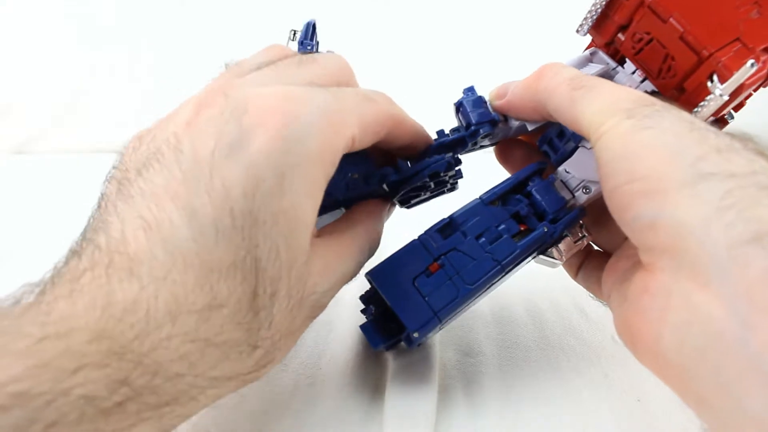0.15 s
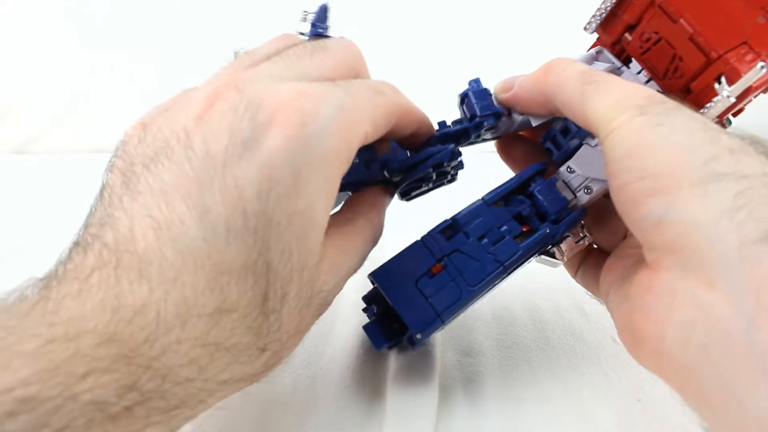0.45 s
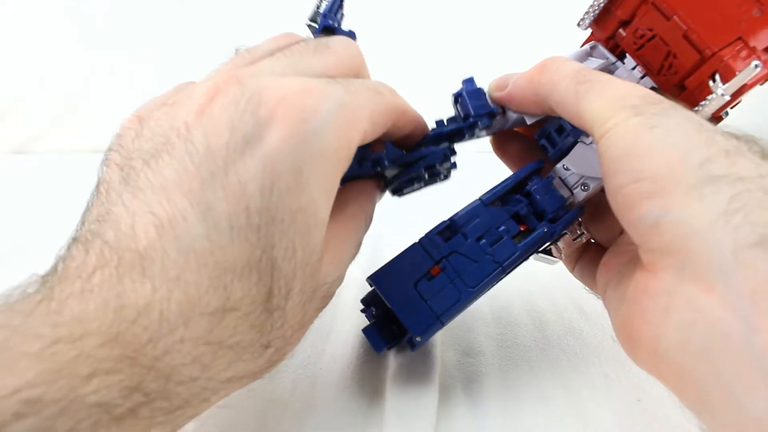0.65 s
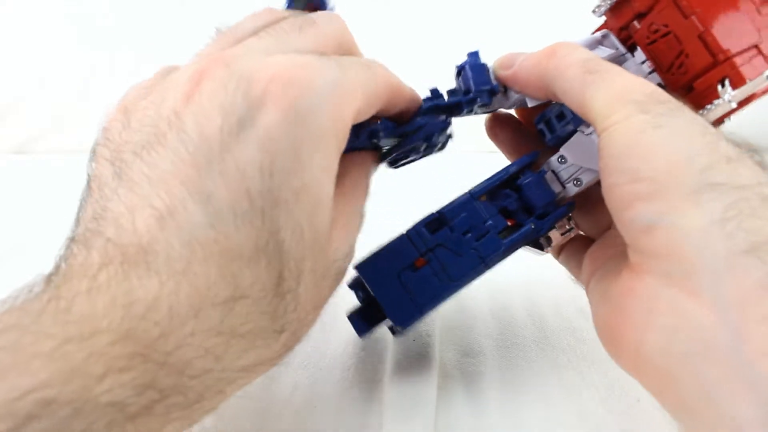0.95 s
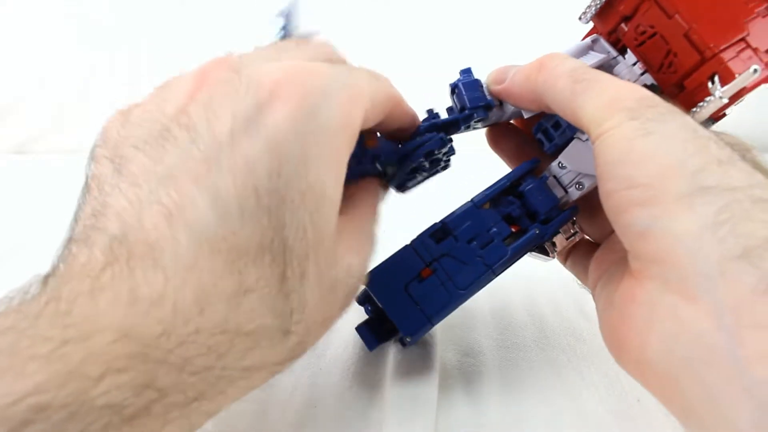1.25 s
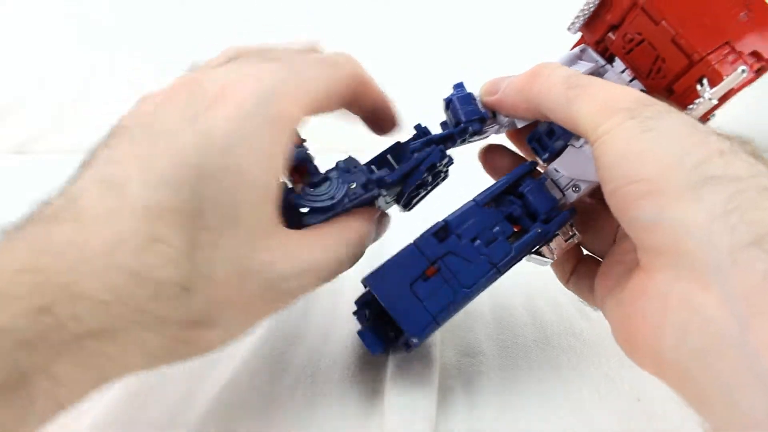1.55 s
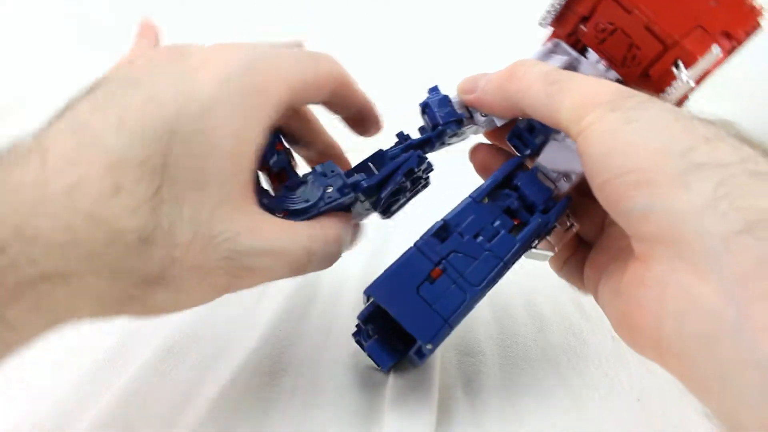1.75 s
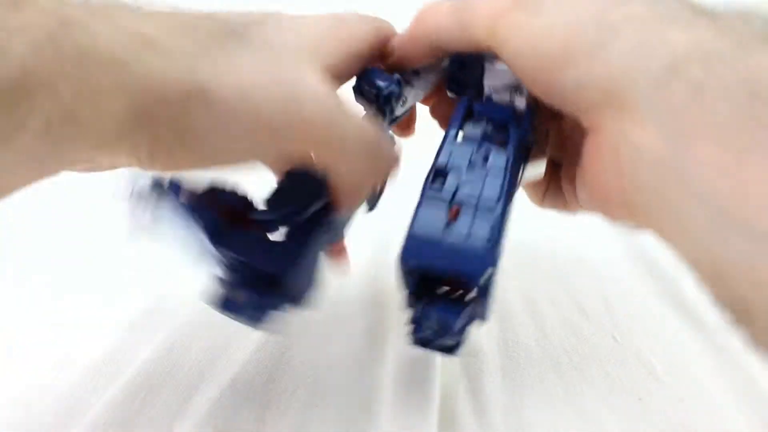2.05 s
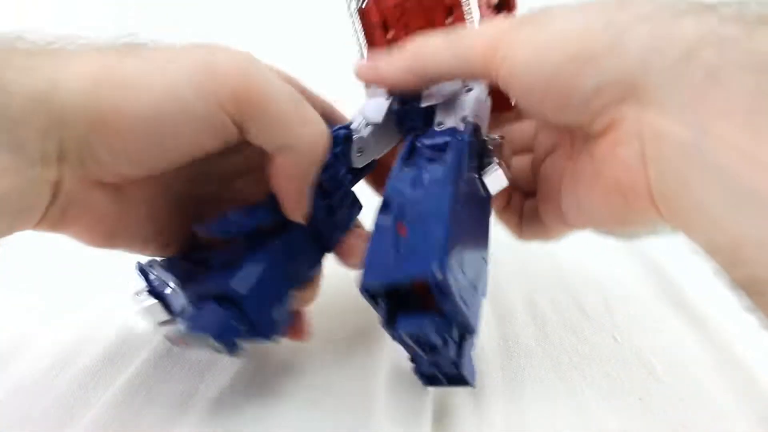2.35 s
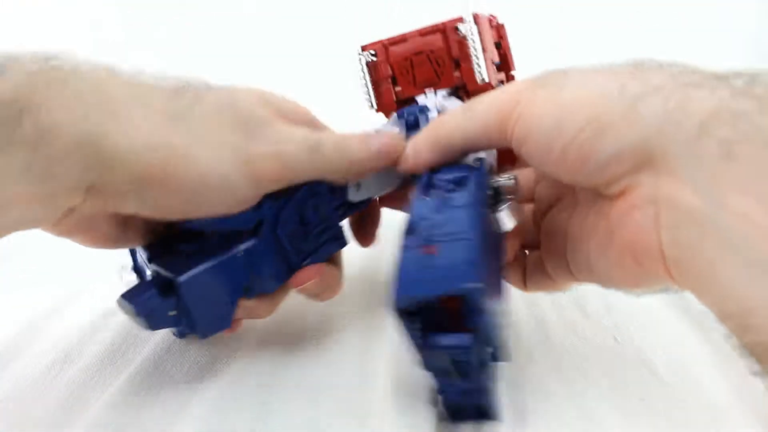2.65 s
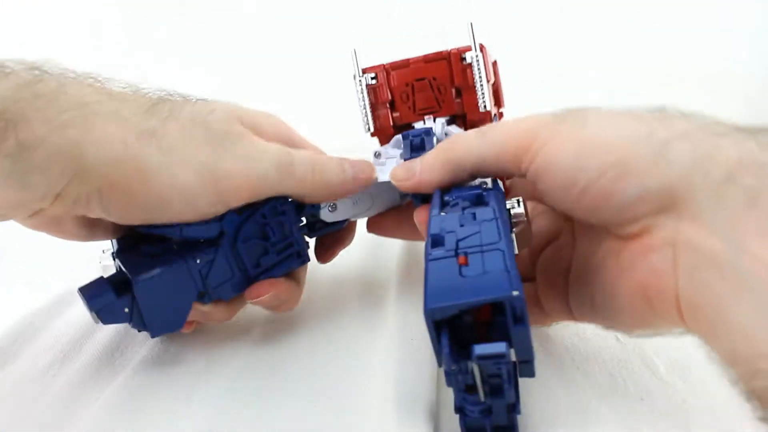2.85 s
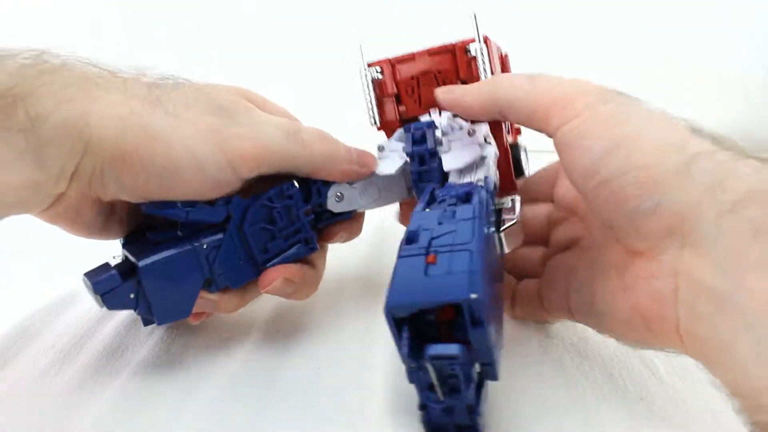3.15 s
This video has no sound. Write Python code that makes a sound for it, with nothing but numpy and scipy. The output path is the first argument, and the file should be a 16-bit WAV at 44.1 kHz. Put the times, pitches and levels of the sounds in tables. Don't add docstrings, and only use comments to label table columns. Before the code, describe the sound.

Plastic toy parts click softly as they are turned by hand, ending in three hard clacks

```python
import sys
import numpy as np
from scipy import signal
from scipy.io import wavfile

SR = 44100
rng = np.random.default_rng(int(sys.argv[2]) if len(sys.argv) > 2 else 0)


def natural_amplitude(level_db):
    exponent = np.asarray(level_db, float) / 20
    return 10 ** exponent


def inscribe(sig):
    pcm = np.round(np.clip(np.atleast_2d(sig).T, -1, 1) * 32767)
    wavfile.write(sys.argv[1], SR, pcm.astype(np.int16))


N = 145530

# (frequency [Hz], level [dB], t60 [s])
SHELL_MODES = [(1050, -3, .02), (1450, -12, .015), (1950, -3, .02), (2400, -6, .015), (3190, -3, .012),
               (4170, -4, .012), (5200, -2, .012), (5990, -1, .012), (6730, 0, .012), (7650, -2, .01),
               (8580, -3, .01), (10500, -5, .008), (12300, -4, .008), (13500, -7, .008)]


def rms_one(x):
    return x / np.sqrt(np.mean(x ** 2) + 1e-20)


def at_hz(points, hz):
    table_hz, values = np.transpose(points)
    return np.interp(np.log(hz), np.log(table_hz), values)


def band(x, low_hz, high_hz, order=2):
    sos = signal.butter(order, [low_hz, min(high_hz, .45 * SR)], "band", fs=SR, output="sos")
    return signal.sosfilt(sos, x)


def cut(x, top_hz):
    return signal.sosfilt(signal.ellip(8, .5, 60, top_hz, fs=SR, output="sos"), x)


def drift(rate_hz):
    r = np.exp(-80 * np.pi * rate_hz / SR)
    slow = signal.lfilter([1], [1, -2 * r, r * r], rng.standard_normal(N // 40 + 2002))[2000:]
    return np.interp(np.arange(N) / 40, np.arange(len(slow)), rms_one(slow - slow.mean()))


def ring(x, hz, t60_s):
    r, w = natural_amplitude(-60 / (t60_s * SR)), 2 * np.pi * hz / SR
    return signal.lfilter([0, np.sin(w)], [1, -2 * r * np.cos(w), r * r], x + 1e-18)


def resonant_noise(peaks):
    return sum(natural_amplitude(db) * rms_one(ring(rng.standard_normal(N), hz, 2.2 / width_hz)) for hz, width_hz, db in peaks)


def add(out, x, s):
    i = int(s * SR)
    out[i:i + len(x)] += x[:N - i]


def coloured(spectrum, patchy_db):
    out, edges_hz = 0, 40 * 2 ** np.arange(0, 9.1, .5)
    white = rng.standard_normal((2, N))
    for k, (low_hz, high_hz) in enumerate(zip(edges_hz, edges_hz[1:])):
        gain = natural_amplitude(at_hz(spectrum, np.sqrt(low_hz * high_hz)) + patchy_db * drift(12.0))
        out = out + gain * band(white[k % 2], low_hz, high_hz)
    return rms_one(out)


def quiet_air():
    # (frequency [Hz], density [dB per Hz])
    air_spectrum = [(40, 4.5), (82, -20), (215, -17), (420, -23.5), (800, -24.5), (2000, -34),
                    (5000, -45.5), (13000, -48)]
    # (frequency [Hz], width [Hz], level [dB])
    hum_peaks = [(63, 26, -85), (125, 24, -78.5), (228, 49, -77.5), (416.8, 46, -77.5)]
    air_db, hiss_top_hz = -69.5, 12800
    return natural_amplitude(air_db) * cut(coloured(air_spectrum, patchy_db=0.5), hiss_top_hz) + resonant_noise(hum_peaks)


def stroke(start_s, length_s):
    rise_s, fade_s, flicker_db = .07, .07, 1.2
    t = np.arange(N) / SR - start_s
    shape = np.clip(t / rise_s, 0, 1) ** 2 * np.exp(-np.maximum(t - length_s, 0) / fade_s)
    return shape * natural_amplitude(flicker_db * drift(25))


def sliding():
    # (start [s], length [s], level [dB], centre [Hz], width [octaves])
    slides = [(-.05, 0.029, -79, 12900, 0.2), (-.05, 0.4, -80, 5200, 2.3), (0.076, 0.14, -62.5, 3420, 1.56),
              (0.93, 0.078, -80, 5000, 0.79), (1.33, 0.13, -73, 4000, 0.41), (1.39, 0.038, -77, 12100, 0.3),
              (1.39, 0.038, -69.5, 6900, 1), (.64, 0.033, -75, 5900, 1.1), (.64, 0.051, -85, 12300, 0.35),
              (1.79, 0.14, -70, 6900, 0.71), (2.0, 0.19, -74.5, 5480, .4), (1.755, 0.35, -63.5, 9940, 0.45),
              (1.78, 0.21, -65, 3070, 1.3), (1.79, 0.32, -76.5, 13800, 0.45), (2.2, 0.14, -76, 7330, 0.8),
              (2.552, 0.27, -67, 2840, 2.8), (3.134, 0.045, -73, 8700, 2), (1.85, 0.62, -71, 438, 1.09),
              (2.141, 0.35, -66.5, 997, 0.37), (2.367, 0.021, -68, 14100, 0.36)]
    # (start [s], length [s], level [dB], centre [Hz])
    singing = [(.3, .12, -74, 5490), (.3, .09, -76, 6650), (.31, .07, -80, 3850), (.31, .07, -82, 7690),
               (.3, .06, -85, 8630), (.63, .08, -87, 8810), (.64, .07, -86, 3870), (.92, .14, -86, 11800),
               (.93, .07, -85, 3650), (1.37, .08, -85, 11900), (1.31, .1, -82, 4300), (2.14, .2, -72, 1050),
               (1.82, .2, -77, 1950), (2.25, .25, -78, 1850), (1.74, .15, -79, 9000),
               (1.85, .15, -79, 2700)]
    # (frequency [Hz], width [Hz], level [dB])
    hollow_peaks = [(1030, 110, 0), (1900, 220, -3), (2750, 400, -7), (4250, 600, -12)]
    # (start [s], length [s], level [dB])
    cupped = [
        (1.36, 0.16, -72),
        (1.815, 0.34, -66),
        (2.172, 0.3, -64),
    ]
    grit_per_s, grit_db, singing_width_octaves, streak_db = 1500, 6, .028, -36
    grit = 1 + natural_amplitude(grit_db) * (rng.random(N) < grit_per_s / SR) * rng.exponential(size=N)
    hiss = np.zeros(N)
    for s, length_s, db, hz, octaves in [*slides, *[(*row, singing_width_octaves) for row in singing]]:
        half = 2 ** (octaves / 2)
        rub = rms_one(band(grit * rng.standard_normal(N), hz / half, hz * half, order=3))
        hiss += natural_amplitude(db) * stroke(s, length_s) * rub
    streaks = sum(ring(hiss, hz, 2 * t60_s) * (-1) ** k for k, (hz, db, t60_s) in enumerate(SHELL_MODES))
    hollow = rms_one(band(resonant_noise(hollow_peaks), 1000, 6000)) * natural_amplitude(2.1 * drift(45))
    cupping = sum(natural_amplitude(db) * stroke(s, length_s) for s, length_s, db in cupped)
    return hiss + natural_amplitude(streak_db) * streaks + hollow * cupping


def table():
    # (time [s], peak [dB], pitch [Hz], t60 [s])
    thuds = [(0.292, -52.5, 99, 0.15), (0.931, -60, 253, 0.14), (1.102, -34, 98, 0.13),
             (1.136, -44.5, 158, 0.12), (1.578, -44.5, 100, 0.23), (1.662, -42, 76.4, 0.2),
             (1.698, -46, 160, 0.4), (2.323, -31, 74.4, 0.089), (2.333, -44.5, 165.7, 0.27),
             (2.687, -22, 82.6, 0.085), (2.699, -40, 103.3, 0.7), (2.732, -40.5, 162, 0.17),
             (2.77, -47.5, 98.5, 0.19), (2.832, -26, 79.1, 0.073), (2.86, -47.5, 153, 0.14),
             (2.899, -51, 50.95, 0.28)]
    # (time [s], level [dB])
    sway = [(0, -72), (1.05, -73.5), (1.2, -60), (1.75, -53.5), (1.85, -48.5), (2.1, -60.5), (2.3, -61.5),
            (2.34, -49.5), (2.45, -64), (2.66, -64.5), (2.72, -47.5), (2.9, -50.5), (3.0, -61.5),
            (3.3, -71.5)]
    thud_rise_s, sway_hz, sway_width_hz = 0.0086, 27.55, 21.4
    bump_s, bump_db, bump_t60_s, bump_top_hz, bump_lump_db = 2.32, -43.5, 0.45, 510, 3.5
    out, t = np.zeros(N), np.arange(SR) / SR
    for s, db, hz, t60_s in thuds:
        envelope = natural_amplitude(db - 60 * t / t60_s) * (1 - np.exp(-t / thud_rise_s))
        add(out, envelope * np.sin(2 * np.pi * hz * t), s)
    lumps = rms_one(band(rng.standard_normal(N), 48, bump_top_hz, order=3)) * natural_amplitude(bump_lump_db * drift(74))
    add(out, natural_amplitude(bump_db - 60 * t / bump_t60_s) * lumps[:SR], bump_s)
    sway_db = np.interp(np.arange(N) / SR, *np.transpose(sway))
    return out + natural_amplitude(sway_db) * resonant_noise([(sway_hz, sway_width_hz, 0)])


def contact(push, row, luck, ring_db, top_hz):
    shell_db, mode_spread_db, detune, main_ring_t60_s = -27, 2.5, .04, .012
    low_edge_hz, low_split_hz, high_split_hz = 950, 3000, 8500
    s, db, hz, low_db, high_db = row
    shell = sum(natural_amplitude(mode_db + mode_spread_db * a) * ring(push, mode_hz * (1 + detune * b), t60_s)
                for (mode_hz, mode_db, t60_s), a, b in zip(SHELL_MODES, *luck))
    hit = band(push + natural_amplitude(shell_db) * shell, low_edge_hz, top_hz, order=5)
    low = natural_amplitude(low_db) * band(hit, low_edge_hz, low_split_hz)
    middle = band(hit, low_split_hz, high_split_hz)
    high = natural_amplitude(high_db) * band(hit, high_split_hz, 15000)
    main_ring = natural_amplitude(ring_db) * ring(push, hz, main_ring_t60_s * 6000 / hz)
    hit = middle - low - high + main_ring
    return natural_amplitude(db - 12) * hit / np.sqrt(np.sum(hit ** 2) / 441)


def plastic():
    # (time [s], peak [dB], main ring [Hz], low part [dB], high part [dB])
    twist = [
        (0.048, -59, 3980, 1, -25),
        (0.112, -43, 5670, -9, -20),
        (0.1195, -29.5, 5290, -7.5, -3.5),
        (0.173, -42, 7600, -4.5, -9),
        (0.183, -46.5, 7150, -3, 2),
        (0.2016, -35, 1963, -3, 0),
        (0.281, -44, 3970, -11, 1),
        (0.2948, -45.5, 2030, -18, -19),
        (0.3446, -37.5, 5650, -20, 1),
    ]
    # (time [s], peak [dB], main ring [Hz], low part [dB], high part [dB])
    ticks = [(0.6967, -43.5, 5300, -4.5, 1), (0.7801, -64.5, 4170, 1, -18), (0.832, -70, 6600, 2, -19),
             (0.892, -73, 10600, -6, 6), (0.939, -66, 1540, 2, -6), (0.985, -60, 3630, -12, -28),
             (0.9872, -48.5, 5110, -19, -17), (1.0152, -64.5, 5000, -2, -17), (1.045, -85, 14000, -15, 18),
             (1.058, -59.5, 11300, 9, 12), (1.1069, -66, 12300, -1, -7), (1.313, -63.5, 2380, 4, -5),
             (1.3486, -68, 2420, 3, -20), (1.3739, -53, 2350, 7, -36), (1.4016, -63, 2400, -5, -12),
             (1.4558, -40.5, 2054, -16, 0.5), (1.4631, -45.5, 5600, -24, -24),
             (1.5403, -76, 11400, -18, 19), (3.111, -65, 3100, -20, -14),
             (3.1928, -42.5, 13040, -14.5, 18.5), (3.2184, -49, 4880, -26, -9)]
    # (time [s], peak [dB], main ring [Hz], low part [dB], high part [dB])
    knocks = [(1.8682, -35, 5480, -4.5, 9), (1.976, -50.5, 4220, -6, -20), (2.024, -49.5, 5500, -8, -6),
              (2.1136, -45.5, 3900, -6, -25), (2.162, -44, 7140, -13, 5), (2.1713, -41.5, 4550, 4, -14),
              (2.1905, -46.5, 12400, 8, 11), (2.219, -58, 7100, -13, -4), (2.229, -56, 12700, -18, 13),
              (2.2517, -50, 5630, -18, 1), (2.26, -55, 4000, -10, -17), (2.2883, -50.5, 6500, -15, -15),
              (2.308, -51, 6400, -5, -14), (2.3247, -44.5, 9000, -4, -5), (2.337, -56, 8500, -16, -7),
              (2.357, -55, 8540, -10, -8), (2.4085, -49, 4520, -18, -1.5), (2.5636, -46.5, 6700, -26, 8),
              (2.598, -60.5, 11000, -5, 8.5), (2.6068, -54, 12500, -16, 1.5),
              (2.6164, -43, 6450, -17.5, -10), (2.6403, -45, 7100, 5, -1.5)]
    # (time [s], peak [dB], main ring [Hz], low part [dB], high part [dB])
    ratchet = [
        (2.4219, -30.5, 7750, -2, -4.5),
        (2.422, -34, 3800, -4.5, -9),
        (2.676, -44, 7450, -10.5, -1.5),
        (2.675, -15.5, 5500, -8.5, 1.5),
        (2.7196, -16, 6700, -7, 6),
        (2.7611, -15, 6470, -8.5, 10.5),
    ]
    chatter_s, snap_s, rise_s, spread_db = 0.0045, 0.0028, 0.00022, 2.5
    near_ring_db, far_ring_db = -18.5, -27
    near, around, t = np.zeros(N), np.zeros(N), np.arange(2000) / SR
    click = 1. * (t == 0)
    for rows, decay_s in [(twist, chatter_s), (ticks, chatter_s), (knocks, chatter_s), (ratchet, snap_s)]:
        for row in rows:
            spread = natural_amplitude(spread_db * np.minimum(rng.exponential(size=len(t)), 4))
            chatter = spread * rng.standard_normal(len(t))
            push = chatter * (1 - np.exp(-t / rise_s)) ** 2 * np.exp(-t / decay_s)
            luck = rng.standard_normal((2, len(SHELL_MODES)))
            top_hz = 16200 if row[1] > -44 else 14000
            add(near, contact(push, row, luck, near_ring_db, top_hz), row[0])
            add(around, contact(click, row, luck, far_ring_db, top_hz), row[0])
    return near, around


def room(x):
    # (frequency [Hz], t60 [s])
    decay = [(800, 0.32), (2100, 0.45), (5600, 0.47), (14700, 0.2)]
    room_db, gap_s, echo_s, echo_db = -12, .006, .02, -30
    t, edges_hz = np.arange(SR // 2) / SR, 500 * 2 ** np.arange(0, 5.6, .5)
    tail = np.zeros(len(t))
    for low_hz, high_hz in zip(edges_hz, edges_hz[1:]):
        t60_s = at_hz(decay, np.sqrt(low_hz * high_hz))
        tail += band(rng.standard_normal(len(t)), low_hz, high_hz) * natural_amplitude(-60 * t / t60_s)
    tail = tail * (1 - np.exp(-(t / gap_s) ** 2))
    tail = natural_amplitude(room_db) * tail / np.sqrt(np.sum(tail ** 2))
    tail[int(echo_s * SR)] += natural_amplitude(echo_db)
    return signal.fftconvolve(x, tail)[:N]


def scene():
    near_top_hz, far_top_hz = 16200, 15900
    near, around = plastic()
    far = room(around) + sliding()
    return (cut(near, near_top_hz) + cut(far, far_top_hz) + table() + quiet_air())[None]


def roll_off(x):
    return signal.sosfilt(signal.butter(12, 16850, fs=SR, output="sos"), x)


def record(dry):
    return roll_off(dry)


dry = scene()
out = record(dry)
inscribe(out)
```